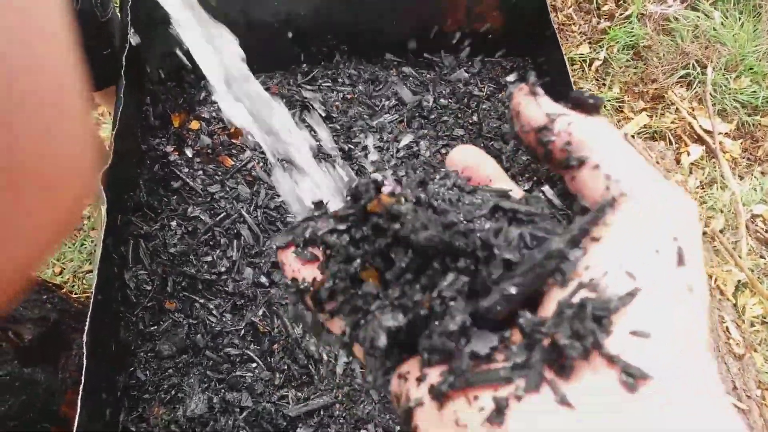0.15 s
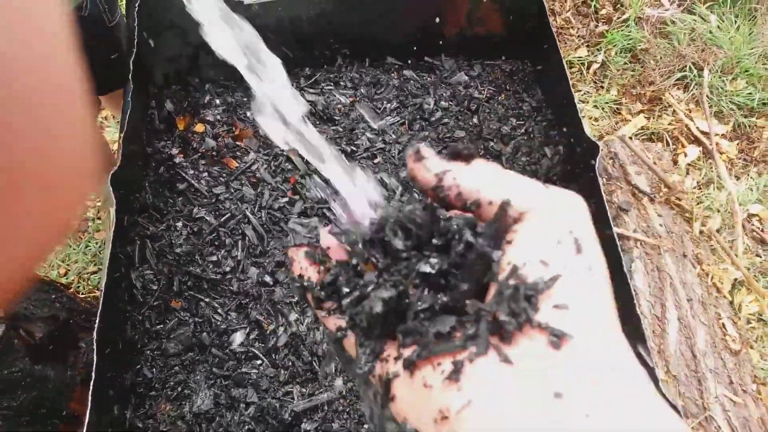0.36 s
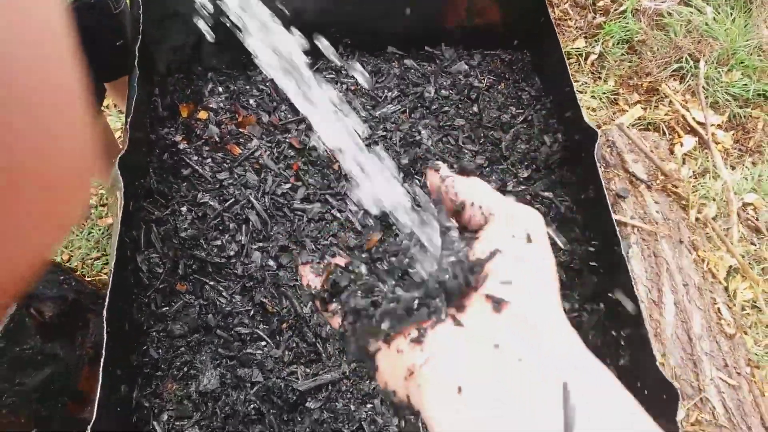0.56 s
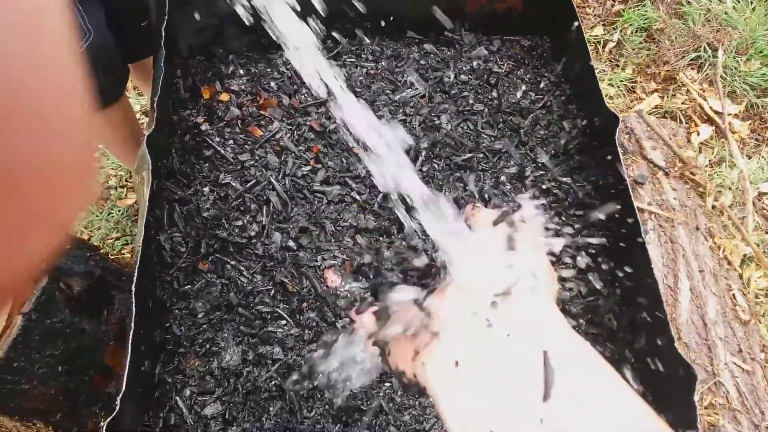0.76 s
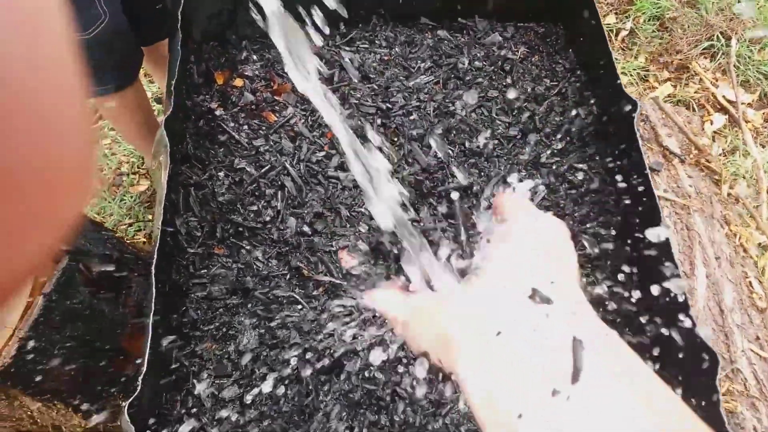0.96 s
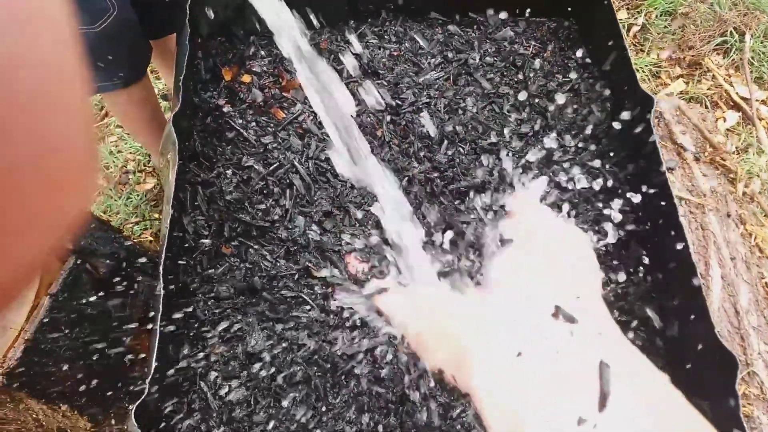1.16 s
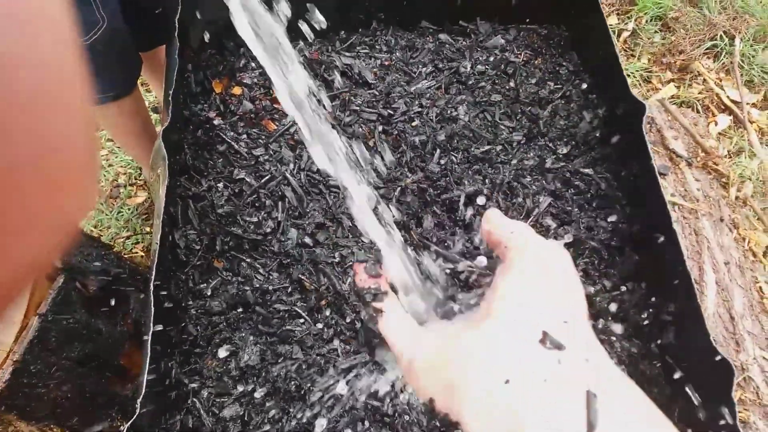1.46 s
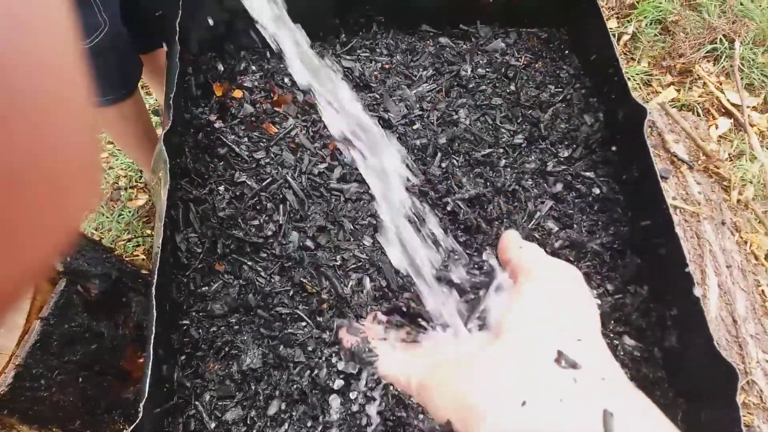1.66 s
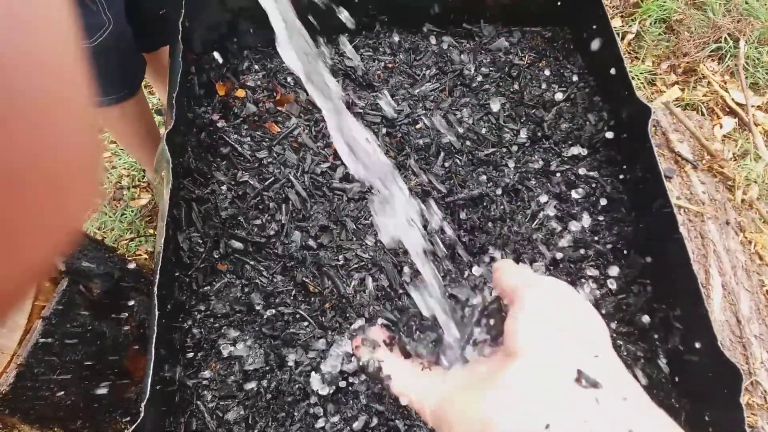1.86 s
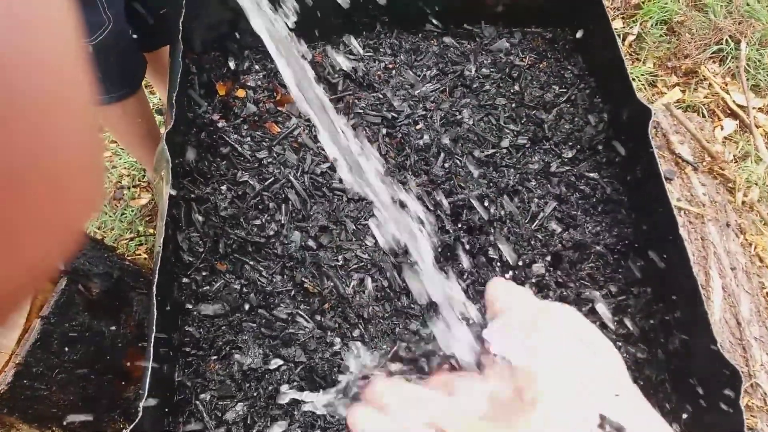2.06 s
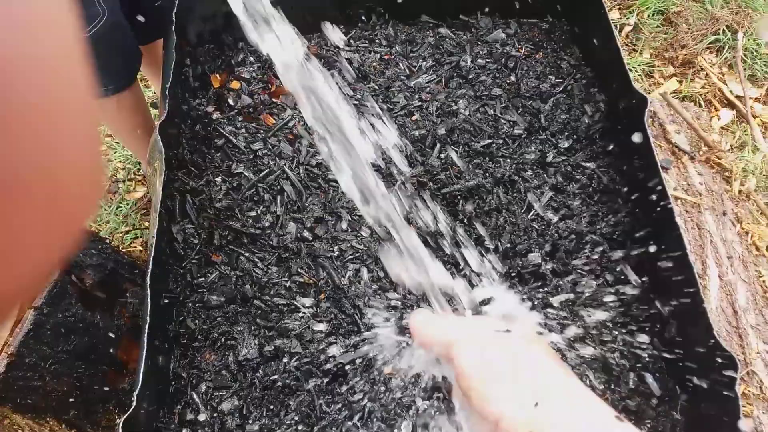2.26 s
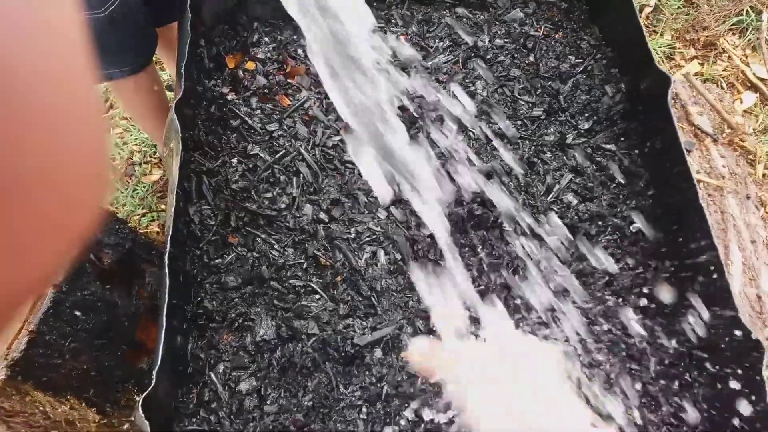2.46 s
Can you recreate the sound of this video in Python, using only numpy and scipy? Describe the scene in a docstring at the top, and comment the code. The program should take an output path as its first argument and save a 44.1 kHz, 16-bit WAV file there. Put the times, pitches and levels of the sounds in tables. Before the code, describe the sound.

Water from a garden hose splashes steadily onto wet charred wood chips, bright, hissy and close

```python
"""Outdoors, a garden hose pours onto a handful of wet charred wood chips and the bed below, close by.
A distant motor hums faintly: a few wavering tones in soft, shaped noise.
The water is noise in three bands, shaped by thousands of tiny drop bursts, with brief hissy splats.
Trapped air plops and gurgles: short ringing tones that rise in pitch. Single drops tap the charcoal."""
import sys
import numpy as np
from scipy import signal
from scipy.fft import rfft, irfft
from scipy.io import wavfile
from scipy.ndimage import uniform_filter1d

SR = 44100
rng = np.random.default_rng(int(sys.argv[2]) if len(sys.argv) > 2 else 0)


def store_wav(level_fs):
    """Save 16-bit WAV to argv[1]."""
    pcm = np.round(np.clip(np.atleast_2d(level_fs), -1, 1) * 32767)
    wavfile.write(sys.argv[1], SR, pcm.T.astype(np.int16))


N = 114660
T = np.arange(N) / SR  # time in seconds
HZ = np.fft.rfftfreq(N, 1 / SR)  # frequencies of the spectrum
# The lower edges of gurgle, patter and spray, and the top of the spray, in Hz.
GURGLE_HZ, PATTER_HZ, SPRAY_HZ, TOP_HZ = 450, 3000, 7000, 16000
DROP_RISE_S = 0.00035


def amp(db):
    """Turns decibels into gain."""
    return 10 ** (np.asarray(db) / 20)


def evened(x):
    """Scales a sound to an rms of one."""
    return x / np.sqrt(np.mean(x ** 2) + 1e-20)


def read(points):
    """Joins (Hz, value) points with lines on a log-frequency axis."""
    hz, value = np.transpose(points)
    return np.interp(np.log(HZ + 1), np.log(hz), value)


def add(mix, s, sound):
    """Adds a sound into the mix, starting at s seconds."""
    start = max(round(s * SR), 0)
    part = mix[..., start:][..., :sound.shape[-1]]
    part += sound[..., :part.shape[-1]]


def band(lo, hi):
    """Soft-edged band whose power adds up to one with its neighbours."""
    below_hi = 1 / (1 + (HZ / hi) ** 24)
    below_lo = 1 / (1 + (HZ / lo) ** 24)
    return np.sqrt(abs(below_hi - below_lo))


def noise(gain):
    """Makes two unrelated noises of one colour."""
    return irfft(rfft(rng.standard_normal((2, N))) * gain, N)


def wander(hz):
    """Random drift of rms one, mostly slower than the given rate."""
    return evened(irfft(rfft(rng.standard_normal(N)) / (1 + (HZ / hz) ** 4), N))


def burst(rise_s, decay_s):
    """Loudness shape of one impact: a quick rise and a fading tail, with a peak of one."""
    t = T[:2048]
    shape = (1 - np.exp(-(t / rise_s) ** 2)) * np.exp(-t / decay_s)
    return shape / shape.max()


# The distant motor's tones.
# Each row: average pitch in Hz, level in dB before the trim and waver below.
MOTOR_TONES = [(64.6, -61), (91.5, -66), (129.2, -61.5), (188.4, -62.5), (253.0, -61.5), (317.6, -69.5),
               (382.2, -74)]


def motor():
    """A far motor hums: its tones share one drifting speed, and each wavers in level and phase."""
    seconds_turned = np.cumsum(1 + 0.011 * wander(hz=9)) / SR
    hum = np.zeros((2, N))
    for hz, db in MOTOR_TONES:
        for port in hum:
            level = amp(db + 3.0 + 2.35 * wander(hz=14.6))
            turns = hz * seconds_turned + rng.random() + 0.053 * wander(hz=10.4)
            port += level * np.sin(2 * np.pi * turns)
    return hum


# The colour of the outdoor air; only the differences matter, as the level is set below.
# Each row: frequency in Hz, strength in dB per Hz.
AIR_COLOUR = [(20, -8), (42, 2.5), (110, 0.5), (280, 2.5), (450, -0.5), (800, -2), (2000, -25.5),
              (8000, -30)]


def outdoor_air():
    """Soft noise, strongest in the low tones, stands for the air outdoors."""
    return amp(-59) * evened(noise(amp(read(AIR_COLOUR))))


def background():
    """The motor's hum sits in the soft outdoor air."""
    return motor() + outdoor_air()


# The colour of the splashing water.
# Each row: frequency in Hz, relative strength in dB per Hz.
SPLASH_COLOUR = [(240, -59), (400, -30.5), (595, -27.5), (673, -23.5), (914, -23.5), (1450, -16),
                 (1990, -9.5), (2630, -5.5), (3360, -12.5), (4630, -5.5), (5310, -11.5), (6680, -16),
                 (8930, -6), (10300, 2.5), (11100, -0.5), (13700, -15.5), (15500, -15.5)]


def water_colour():
    """Gain of splashing water at each frequency."""
    return amp(read(SPLASH_COLOUR))


# How strongly the water flows over time.
# Each row: time in seconds, then the levels of gurgle, patter and spray in dB before their trims.
FLOW_LEVELS = [(0, -31, -28.5, -26.5), (0.04, -32, -31, -25), (0.12, -40, -35.5, -30),
               (0.2, -40, -35.5, -30), (0.3, -37.5, -34, -26.5), (0.44, -36, -32, -25.5),
               (0.48, -39.7, -34.5, -27), (0.53, -37, -32.5, -27), (0.7, -35, -32, -27),
               (0.8, -39.5, -32.0, -30.5), (0.86, -48, -40.5, -36.5), (0.91, -43.4, -35, -32.5),
               (0.99, -40.5, -31, -28), (1.1, -41, -31.5, -27), (1.16, -44.5, -37, -28.5),
               (1.24, -44, -35.4, -29.5), (1.35, -34, -30.2, -27.5), (1.46, -42.5, -34, -30),
               (1.56, -37.5, -31.5, -26.0), (1.68, -39, -32.0, -28.5), (1.85, -38, -29, -26),
               (1.96, -37, -31, -29.5), (2.04, -36.5, -31, -26), (2.14, -41.5, -33, -30),
               (2.24, -36, -31.5, -30), (2.29, -40.5, -37, -32), (2.38, -36, -30, -25),
               (2.45, -42, -38, -31), (2.49, -43, -33, -29), (2.55, -46.5, -39.2, -31),
               (2.6, -48, -39, -31.2)]


def flow(order):
    """Gain of the gurgle (1), patter (2) or spray (3) over time."""
    rows = np.array(FLOW_LEVELS)
    return amp(np.interp(T, rows[:, 0], rows[:, order]))


def ticks(per_s, spread_db):
    """Single drops tap the hard charcoal: clicks in water colour, delayed in the second signal."""
    happens = rng.random(N) < per_s / SR
    taps = happens * rng.choice([-1, 1], N) * amp(spread_db * rng.random(N) ** 2)
    spectrum = rfft(taps) * water_colour() * band(GURGLE_HZ, SPRAY_HZ)
    delay = np.exp(-2j * np.pi * HZ * 0.000594)  # seconds
    return evened(irfft(np.array([spectrum, spectrum * delay]), N))


def bubble(hz, cycles, glide):
    """A pocket of air rings and rises in pitch around hz; cycles sets how long it fades."""
    t, decay_s = T[:2048], cycles / hz
    pitch = hz * (1 + glide * (np.tanh(t / decay_s / 2) - 0.5))
    turns = np.cumsum(pitch) / SR
    return burst(DROP_RISE_S, decay_s) * np.sin(2 * np.pi * (turns + rng.random((2, 1))))


def bubbles(low_hz, high_hz, cycles, spread_db, count):
    """Small bubbles in the gaps between the soaked chips ring and rise slightly in pitch."""
    out, colour = np.zeros((2, N)), water_colour()
    for when, pitch, size, ring in rng.random((count, 4)):
        hz = low_hz * (high_hz / low_hz) ** pitch
        level = np.interp(hz, HZ, colour) * amp(spread_db * size ** 2)
        add(out, when * T[-1], level * bubble(hz, cycles * (0.5 + ring), glide=0.04))
    return evened(out)


def froth():
    """Coarse bubbles and hard taps follow the gurgle's strength; fine bubbles follow the spray's."""
    coarse = bubbles(low_hz=1210, high_hz=5080, cycles=10.7, spread_db=17.5, count=420)
    fine = bubbles(low_hz=8000, high_hz=14130, cycles=31, spread_db=4, count=520)
    low_froth = amp(-5.5) * coarse + amp(-5) * ticks(per_s=130, spread_db=11)
    return flow(order=1) * low_froth + amp(-7.5) * flow(order=3) * fine


# Slugs of water squeezing through the chips.
# Each row: start in seconds, level in dB before the trim below, middle pitch of the cluster in Hz.
WATER_SLUGS = [(0.02, -28.5, 2420), (0.041, -25, 2600), (0.109, -29, 2670), (0.237, -31.5, 1830),
               (0.28, -29.5, 2380), (0.512, -26, 2150), (0.61, -23.5, 2730), (0.694, -28, 2440),
               (0.823, -28.5, 2580), (1.003, -35, 2830), (1.299, -36, 2780), (1.864, -27, 2950),
               (2.014, -26.5, 2670), (2.044, -24.5, 2430), (2.18, -25.5, 2680), (2.33, -24.5, 2140),
               (2.478, -30, 2680), (2.587, -32, 2370)]


def gulps():
    """A slug of water closes a cluster of air pockets: five nearby rising rings and a short fizz."""
    rings, fizz = np.zeros((2, N)), np.zeros(N)
    for s, db, hz in WATER_SLUGS:
        level = amp(db - 2.5)
        for when, pitch in rng.random((5, 2)):
            pocket_hz = hz * 2 ** (0.9 * (pitch - 0.5))
            add(rings, s + 0.0068 * when, level * bubble(pocket_hz, cycles=4.6, glide=0.27))
        add(fizz, s, level * burst(0.0011, 0.0035))
    rings = irfft(rfft(rings) * band(1450, TOP_HZ), N)
    return rings + fizz * evened(noise(water_colour() * band(1070, 4340)))


# Larger air pockets collapsing.
# Each row: time in seconds (the sounds begin about a millisecond later), level in dB before
# the trims below, middle pitch in Hz.
AIR_POCKETS = [(0.5799, -10.5, 4700), (0.6117, -14.5, 4830), (1.004, -12, 4870), (1.26, -16, 5020),
               (1.2765, -9.5, 4460), (1.2979, -11, 4770), (1.3328, -16, 4400), (1.7074, -18, 4830),
               (1.721, -16.5, 4900), (1.8653, -9.5, 3660), (1.9067, -9.5, 4550), (2.0588, -11, 4640),
               (2.0796, -13, 4630), (2.094, -9.5, 4050), (2.127, -16, 4620)]


def plops():
    """Larger air pockets collapse: a short rising ring inside a wet crack of noise."""
    rings, cracks = np.zeros((2, N)), np.zeros(N)
    for s, db, hz in AIR_POCKETS:
        add(rings, s + 0.001176, amp(db - 2.5) * bubble(hz, cycles=7.7, glide=0.26))
        add(cracks, s + 0.00092, amp(db - 14.5) * burst(DROP_RISE_S, 0.00077))
    return rings + cracks * evened(noise(water_colour() * band(1440, SPRAY_HZ)))


# Big drops.
# Each row: start in seconds, levels of the hiss and the wet body in dB before the trims below,
# fading time in seconds.
BIG_DROPS = [(0.0047, -14, -23, 0.003), (0.0317, -13, -37, 0.0038), (0.0465, -12, -18, 0.001),
             (0.1149, -10, -41, 0.00088), (0.24, -14, -24, 0.0019), (0.2695, -18.3, -44, 0.0004),
             (0.2973, -10.5, -22, 0.0012), (0.4278, -23, -39, 0.001), (0.5014, -17.1, -30, 0.0015),
             (0.5185, -16.8, -18, 0.0028), (0.5528, -10.5, -23, 0.001), (0.6419, -9.5, -21, 0.0006),
             (0.6875, -18, -38, 0.001), (0.8012, -13.5, -22, 0.0013), (0.82, -15.5, -26, 0.002),
             (0.824, -17, -20.5, 0.0012), (0.8344, -12, -27, 0.00065), (0.8704, -13, -30, 0.00099),
             (0.8891, -13, -27, 0.002), (0.9201, -12, -36.8, 0.00077), (0.94, -15, -19, 0.0015),
             (0.9967, -16.6, -43, 0.00037), (1.0076, -14.5, -20, 0.0016), (1.035, -14, -22, 0.0029),
             (1.078, -13, -46, 0.0008), (1.128, -11, -24, 0.00079), (1.1497, -9.5, -16.5, 0.0013),
             (1.2024, -9.5, -23, 0.001), (1.251, -14.5, -18, 0.00073), (1.2628, -11, -24, 0.0011),
             (1.299, -10.5, -14, 0.00052), (1.3364, -15.5, -35, 0.00084), (1.4216, -13, -14, 0.001),
             (1.426, -14, -45, 0.0011), (1.4507, -10, -36, 0.00066), (1.4709, -14, -43, 0.0009),
             (1.477, -14, -27, 0.001), (1.5017, -12.5, -39, 0.0009), (1.5398, -10.5, -40.5, 0.00057),
             (1.5644, -15, -16, 0.0005), (1.587, -17.1, -41.1, 0.00091), (1.608, -16.2, -37, 0.00065),
             (1.667, -15.5, -35, 0.001), (1.706, -11, -22, 0.0013), (1.7506, -12.5, -39, 0.0019),
             (1.7967, -23, -38.5, 0.00046), (1.805, -7.5, -37, 0.0011), (1.8946, -12, -37.9, 0.0011),
             (1.9498, -14.5, -28, 0.0021), (1.988, -12, -43, 0.0009), (2.1158, -13, -29, 0.0022),
             (2.124, -16.5, -40.8, 0.0011), (2.1276, -17.9, -17.5, 0.0012), (2.152, -10, -17, 0.0014),
             (2.1834, -12, -17, 0.00076), (2.218, -18.4, -30, 0.00039), (2.3127, -12.5, -30, 0.0013),
             (2.335, -18.0, -39, 0.0008), (2.3611, -19, -23, 0.00066), (2.3919, -12, -44, 0.001),
             (2.447, -11.5, -42, 0.0019), (2.4681, -9, -46, 0.0014), (2.5147, -15, -43, 0.0018),
             (2.553, -14, -47, 0.0011), (2.5625, -13.5, -41.8, 0.0011), (2.5956, -16, -41, 0.0014)]


def splats():
    """Big drops burst in a bright hiss with a lower wet body; both end in a faint tail."""
    hiss, body = np.zeros((2, N))
    tail = amp(-24.5) * burst(0.002, 0.003)
    for s, hiss_db, body_db, decay_s in BIG_DROPS:
        shape = burst(0.00024, decay_s) + tail
        add(hiss, s, amp(hiss_db - 2.2) * shape)
        add(body, s, amp(body_db - 2.43) * shape)
    colour = water_colour()
    bright = hiss * evened(noise(colour * band(SPRAY_HZ, TOP_HZ)))
    return bright + body * evened(noise(colour * band(PATTER_HZ, SPRAY_HZ)))


def splashing(hits, lo, hi, decay_s, colour_db, wash_db, patchy_db, count):
    """Each drop fizzes with a colour of its own over a patchy wash of finer droplets."""
    out, colour = np.zeros((2, N)), water_colour()
    edges = np.geomspace(lo, hi, count + 1)
    for a, b in zip(edges, edges[1:]):
        # Every drop gets its own random level in this band.
        power = (hits * amp(colour_db * (2 * rng.random(N) - 1))) ** 2
        power = abs(signal.oaconvolve(power, burst(DROP_RISE_S, decay_s) ** 2)[:N])
        # Dividing by a running average takes out the slow swells.
        power /= uniform_filter1d(power, size=4000) + 1e-12
        fizz = np.sqrt(power + amp(wash_db) ** 2)
        out += noise(colour * band(a, b)) * fizz * amp(patchy_db * wander(hz=21))
    return evened(out)


def stream():
    """The jet breaks into clumps of drops that land on the hand and the chips."""
    drops_per_s, spread_db = 900, 2  # drops per second before clumping changes only their levels
    clumps = amp(3.05 * wander(hz=46.3))
    lands = rng.random(N) < drops_per_s / SR
    hits = lands * amp(spread_db * np.clip(rng.standard_normal(N), -2, 2)) * clumps
    gurgle = splashing(hits, GURGLE_HZ, PATTER_HZ, decay_s=0.0021, colour_db=15.5,
                       wash_db=-2.5, patchy_db=1, count=7)
    patter = splashing(hits, PATTER_HZ, SPRAY_HZ, decay_s=0.0021, colour_db=9,
                       wash_db=-1, patchy_db=1.6, count=5)
    spray = splashing(hits, SPRAY_HZ, TOP_HZ, decay_s=0.0011, colour_db=3,
                      wash_db=-3.5, patchy_db=1.14, count=7)
    water = amp(-1.66) * flow(order=1) * gurgle
    water += amp(-0.48) * flow(order=2) * patter
    return water + amp(0.16) * flow(order=3) * spray


# How much of the water sound takes on the colour of the heaped chips.
# Each row: time in seconds, share from 0 to 1.
HEAP_SHARE = [(0, 0.48), (.45, 0.82), (.85, 0.0024), (2.6, 0)]
# The change of colour while the jet hits the heap in the hand.
# Each row: frequency in Hz, change in dB.
HEAP_COLOUR = [(600, 0.5), (1400, 1.5), (2300, -1), (3000, -4.5), (3700, -2), (4600, -1), (5400, 3),
               (7000, 3), (8600, -3.5), (10000, -1.5), (11000, 1), (14500, 6)]


def heaped(water):
    """The heap of chips sounds hollower and finer than the bare hand, until it is washed away."""
    share = np.clip(np.interp(T, *np.transpose(HEAP_SHARE)), 0, 1)
    on_heap = irfft(rfft(water) * amp(read(HEAP_COLOUR)), N)
    return (1 - share) * water + share * on_heap


# The level difference of the two ports. Each row: frequency in Hz, left minus right in dB.
PORT_LEVEL = [(60, -1), (500, -1), (900, -2.5), (1500, -12), (2500, -9), (3600, -3), (4700, -1.5),
              (5300, -0.5), (6000, -2), (7100, 2.5), (8200, -15.5), (9300, -18), (10500, -24), (12000, -20),
              (14000, -9.5), (15300, -14)]
# How alike the two ports are. Each row: frequency in Hz, likeness from 0 (unrelated) to 1 (same).
PORT_LIKENESS = [(60, 0.95), (300, 0.88), (600, 0.61), (1500, 0.64), (3500, 0.49), (4600, 0.58),
                 (5800, 0.067), (7200, 0.81), (10500, 0.89), (15000, .68)]
# The timing of the ports. Each row: frequency in Hz, lead of the left port in radians.
PORT_LEAD = [(60, -0.35), (400, -0.38), (950, -0.86), (1600, -0.91), (2100, 0.19), (4000, 0.82),
             (4900, 0.52), (7000, 0.54)]


def two_ports(sound):
    """Two microphone ports hear the sound; the right one faces the water and is much brighter."""
    shared, other = rfft(sound)
    same, lean = np.clip(read(PORT_LIKENESS), 0, 1), amp(read(PORT_LEVEL))
    left = same * shared + np.sqrt(1 - same ** 2) * other
    left = left * lean * np.exp(1j * read(PORT_LEAD))
    # Sets the level as if the average of both ports, without the lead, had a gain of one.
    level = 2 / np.sqrt(1 + lean ** 2 + 2 * lean * same)
    return irfft(np.array([left, shared]) * level, N)


def scene():
    """The background, the trapped air, the big drops and the stream reach both ports."""
    sound = background() + gulps() + plops() + splats()
    return two_ports(sound + heaped(froth() + stream()))


def record(dry):
    """Rounds peaks near full scale, then removes the highest treble."""
    held = dry / (1 + dry ** 6) ** (1 / 6)
    lowpass = signal.firwin(401, 15600, window=("kaiser", 9), fs=SR)  # edge in Hz
    return signal.oaconvolve(held, lowpass[None], "same")


dry = scene()
out = record(dry)
store_wav(out)
```